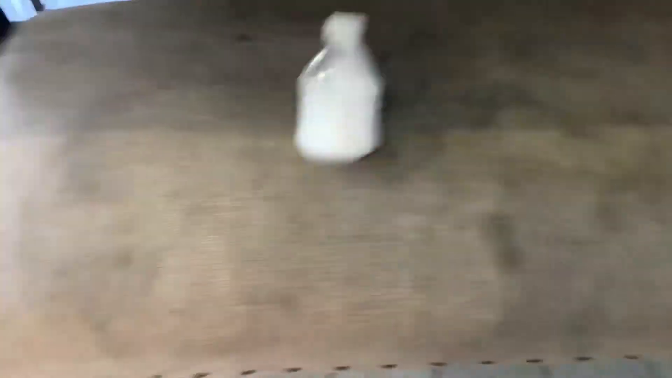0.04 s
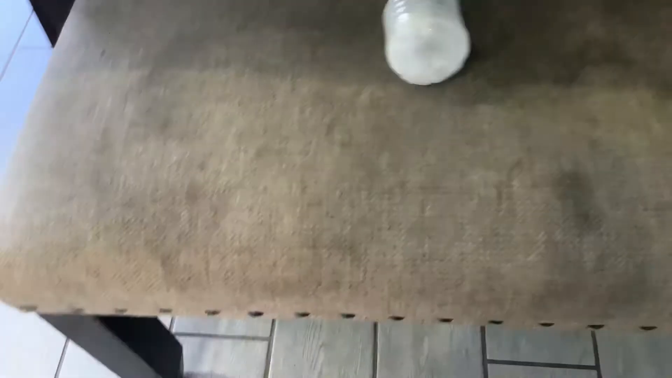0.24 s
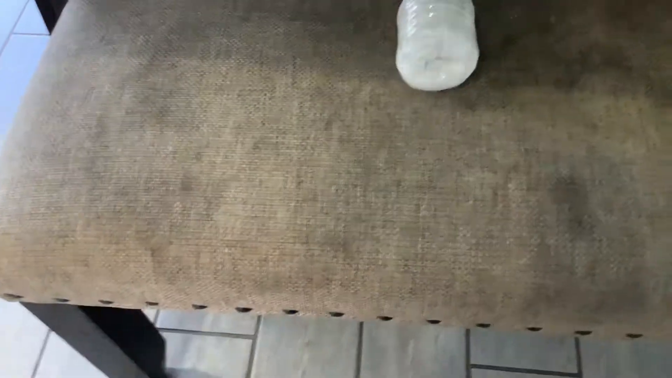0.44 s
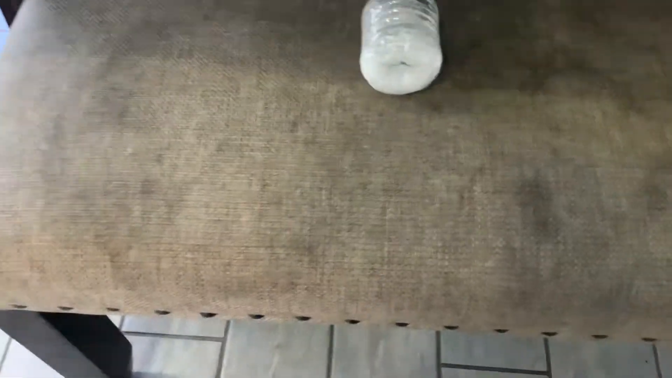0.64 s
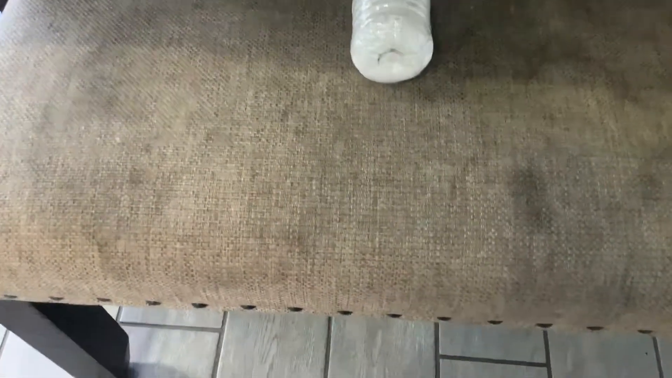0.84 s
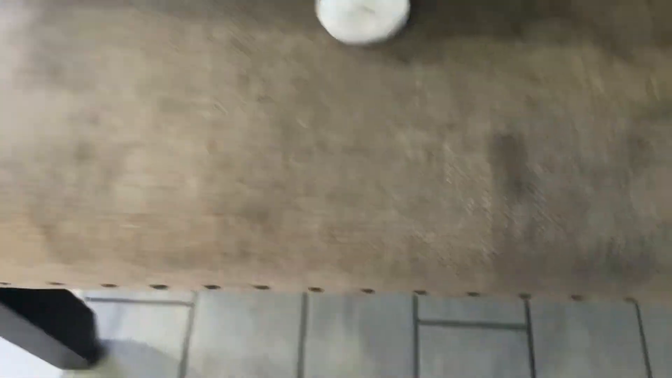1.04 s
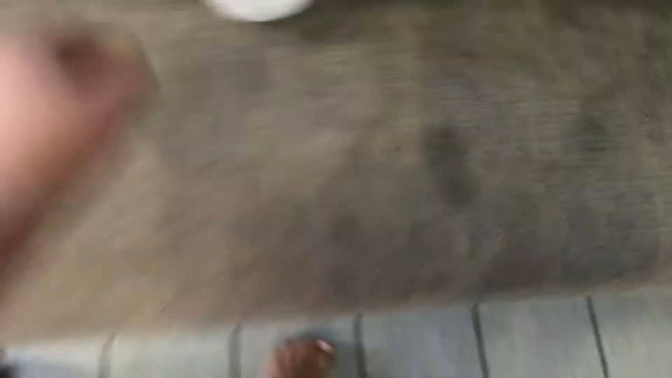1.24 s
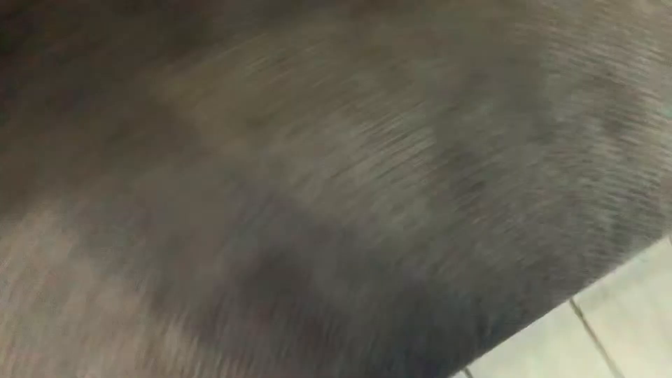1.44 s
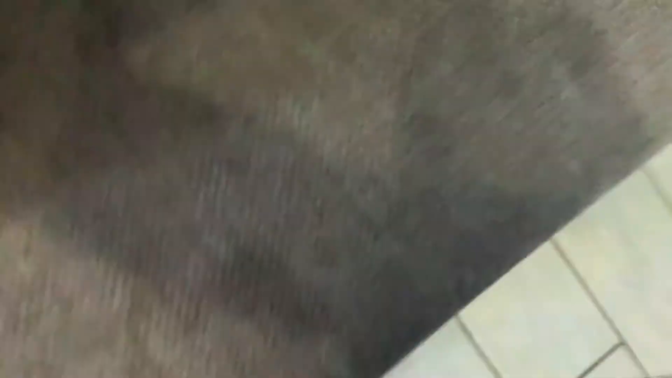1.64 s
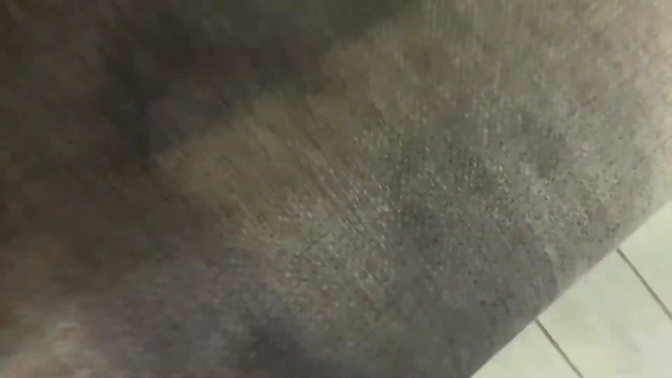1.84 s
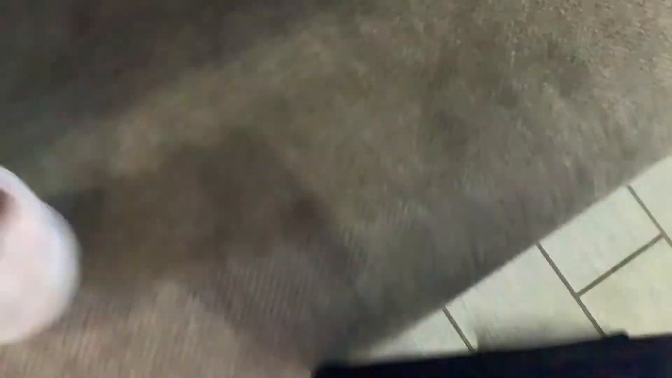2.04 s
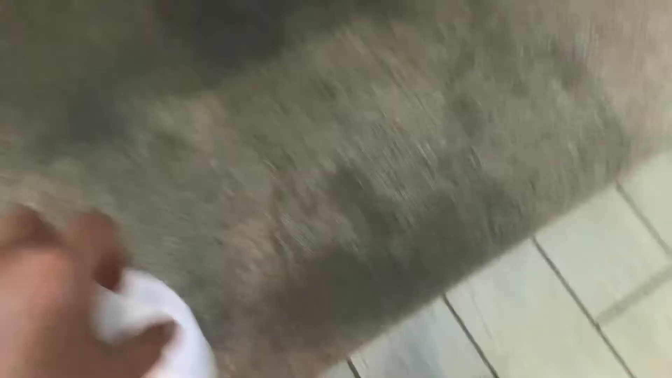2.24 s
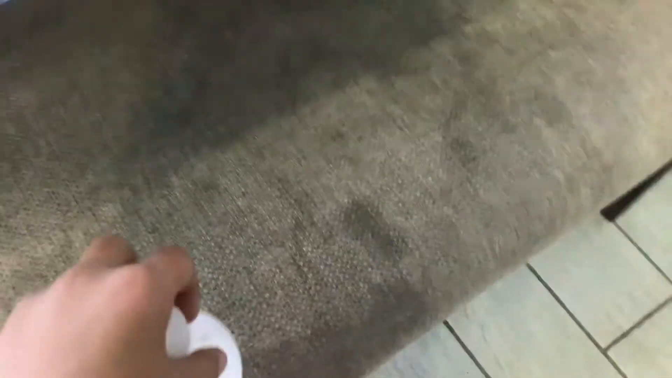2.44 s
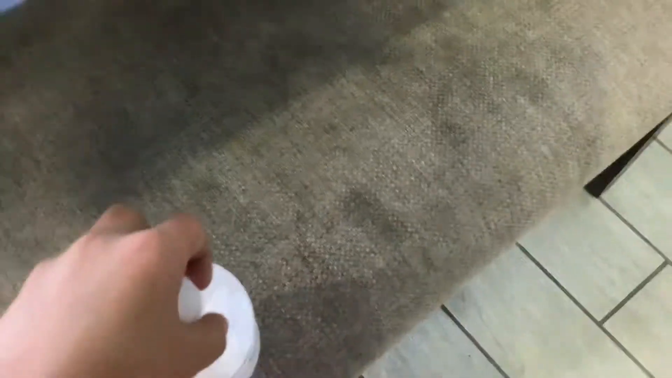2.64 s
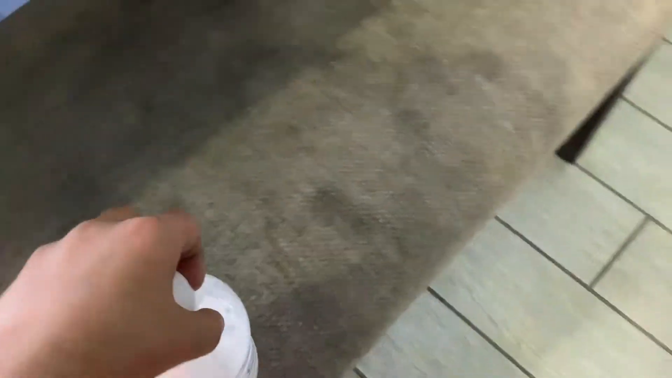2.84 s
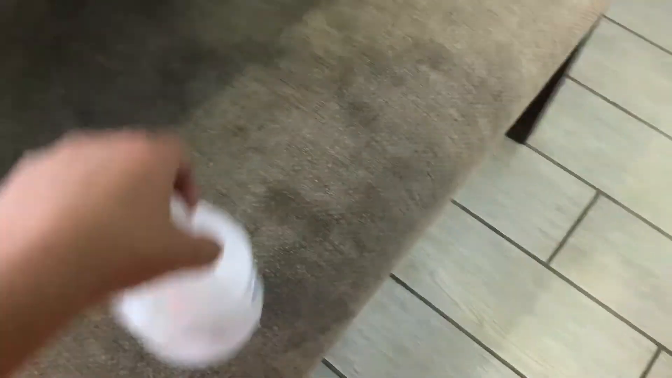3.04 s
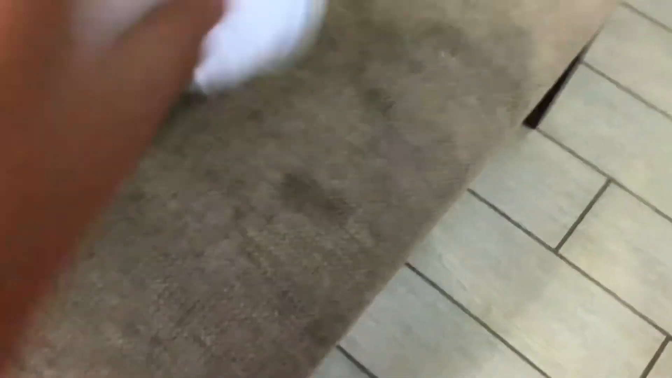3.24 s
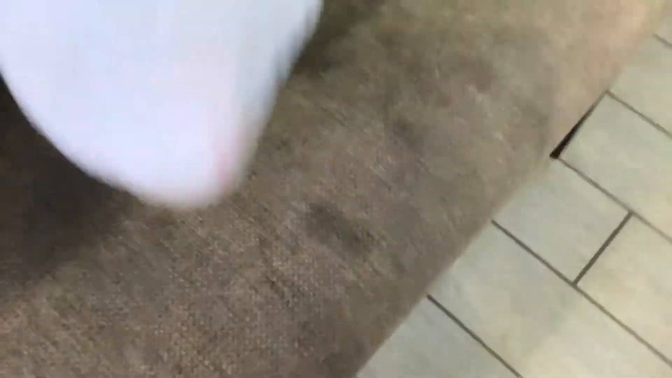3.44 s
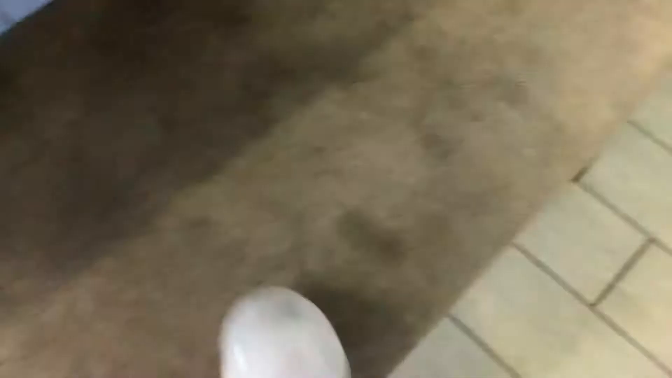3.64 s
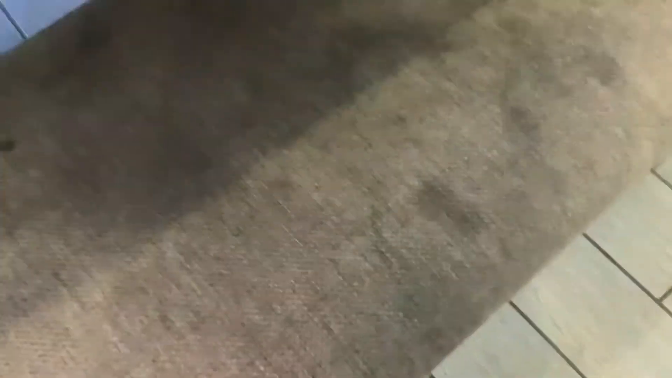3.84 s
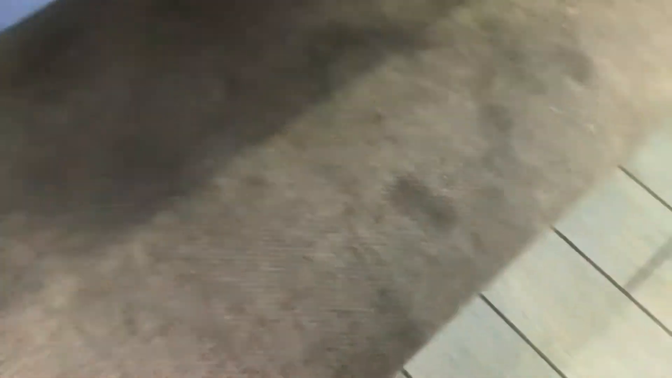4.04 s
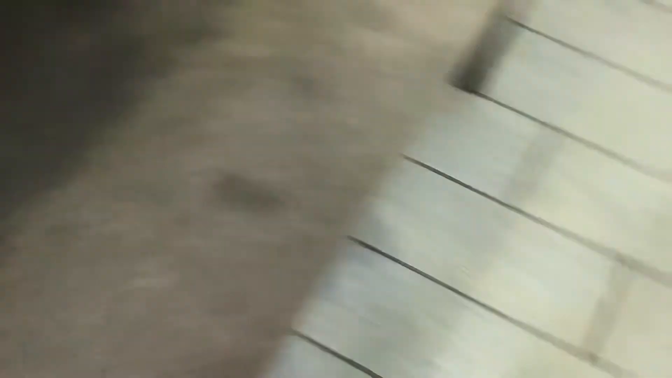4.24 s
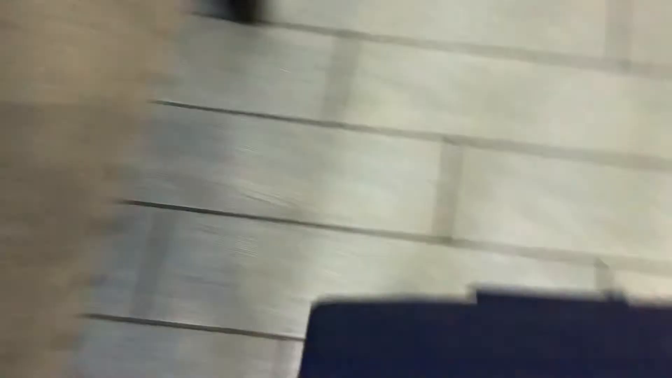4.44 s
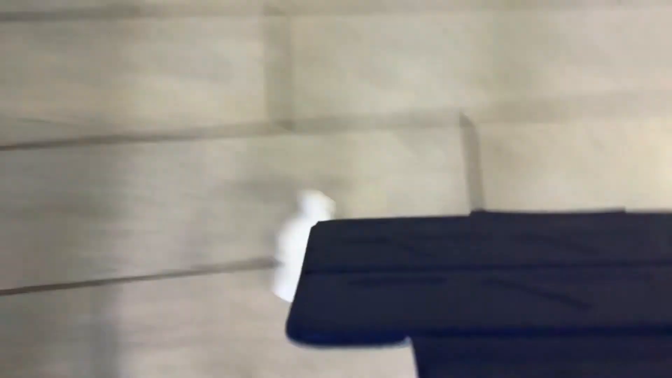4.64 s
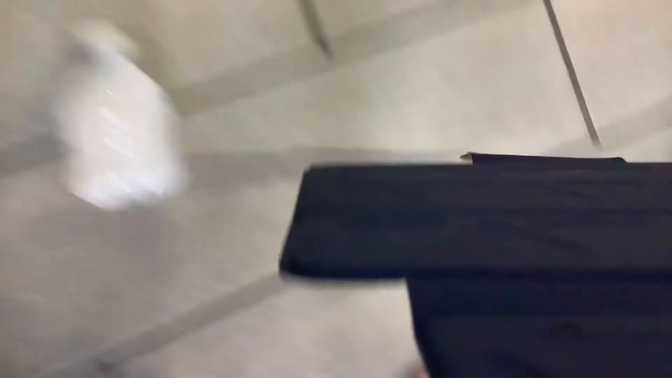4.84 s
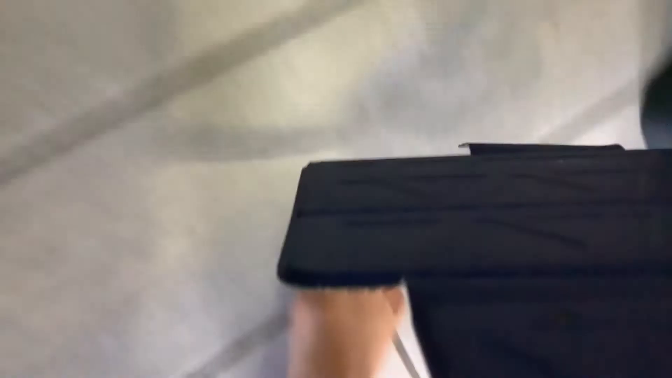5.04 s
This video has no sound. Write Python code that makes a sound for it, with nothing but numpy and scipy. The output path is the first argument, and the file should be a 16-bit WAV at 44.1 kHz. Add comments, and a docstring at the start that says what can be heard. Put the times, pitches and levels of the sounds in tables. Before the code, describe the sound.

Two dull thumps of a plastic water bottle on a cushion, light handling ticks, then a loud crack on a tiled floor.

```python
"""A part-filled plastic bottle is flipped onto a padded bench, picked up, flipped again and falls on tiles.
On the bench the bottle rings low, the cushion and the room boom and the water slaps; on the floor it
cracks sharply and the tiled room echoes. In between, its thin wall snaps and fingers tick and rub on it.
Cloth and skin rustle near a handheld phone, a foot slides, and an appliance hums over a low rush."""
import sys
import numpy as np
from scipy import signal
from scipy.fft import rfft, irfft, next_fast_len
from scipy.io import wavfile
from scipy.ndimage import map_coordinates

SR = 44100
rng = np.random.default_rng(int(sys.argv[2]) if len(sys.argv) > 2 else 0)


def store_pcm(level_fs):
    """Save levels as 16-bit WAV."""
    pcm = np.round(np.clip(level_fs, -1, 1) * 32767).astype(np.int16)
    wavfile.write(sys.argv[1], SR, np.atleast_2d(pcm).T)


N = 225174
TIME = np.arange(N) / SR  # seconds through the scene
T = np.arange(SR // 2) / SR  # seconds through one short sound
RUSH_MEAN_DB, CLOTH_MEAN_DB = -52, -70

# how long the room takes to fade by 60 dB: (frequency [Hz], fade time [s])
ROOM_FADE = [(250, 0.635), (400, 0.604), (700, 0.469), (2000, 0.4806), (6000, 0.453), (14000, 0.398)]
# the hum as the phone moves through loud and quiet spots in the room: (time [s], level [dB])
HUM_LEVEL = [(0.0, -40), (0.5, -42.5), (0.65, -44.5), (1.7, -45), (2.03, -57.5), (2.28, -42.5), (2.76, -37),
             (3.04, -41), (3.5, -42.5), (3.71, -50), (4.08, -41), (4.25, -47), (4.54, -53), (4.82, -46),
             (5.02, -35), (5.11, -38.5)]
# low background rush, plus the room's low boom after each bench landing: (time [s], level [dB])
RUSH_LEVEL = [(0.0, -45), (0.22, -52.5), (0.55, -53), (0.85, -50.5), (1.5, -51.5), (2.2, -52.5), (2.5, -53),
              (2.95, -57.5), (3.2, -51), (3.59, -53.5), (3.63, -43), (3.9, -51), (4.45, -52.5), (4.8, -49),
              (5.11, -51)]
# tone of its low, middle and upper parts: (frequency [Hz], relative level [dB])
RUMBLE_TONE = [(25, -26), (45, -10.5), (65, -3), (90, -1), (115, -3), (150, -28.5)]
RUSH_TONE = [(95, -12), (140, 6.5), (200, 4.5), (260, 1.5), (330, 1.5), (420, -3.5), (560, -44.5)]
WHOOSH_TONE = [(290, -2), (420, 2.5), (600, 0.5), (800, -3.5), (950, -12), (1400, -32.5)]
# cloth sliding as the body moves: (time [s], level [dB])
CLOTH_LEVEL = [(0.0, -71.5), (0.3, -79.5), (0.85, -76.5), (1.05, -71), (1.25, -73), (1.4, -72.5),
               (1.66, -60), (1.85, -69), (2.3, -69), (2.66, -78.5), (2.9, -79.5), (3.1, -72), (3.4, -67),
               (3.9, -68.5), (4.04, -71.5), (4.3, -53.5), (4.5, -71.5), (4.76, -55.5), (4.88, -58),
               (4.96, -66.5), (5.11, -72)]
# tone of far shuffling, near cloth and bright rustles: (frequency [Hz], relative level [dB])
SHUFFLE_TONE = [(600, -30), (950, 3), (1200, 3.5), (1480, 5.5), (1800, 2), (2300, -0.5), (2900, 0),
                (3400, -4.5), (4200, -5.5), (5600, -27)]
CLOTH_TONE = [(2700, 4), (4400, -4), (5500, 1.5), (6600, 1), (8400, -6.5), (11000, -11.5), (16000, -18)]
BRIGHT_TONE = [(3000, -8.5), (5000, -8.5), (8000, -4.5), (10000, -6), (13000, -8), (16000, -10.5)]
# skin brushes and the hissy splash of the bottle landing:
# (peak time [s], level [dB], 20 dB rise [s], 20 dB fall [s])
BRIGHT_RUSTLES = [(.036, -55, 0.0124, 0.058), (0.901, -73.5, 0.025, 0.1325), (1.01, -69, 0.132, 0.054),
                  (1.36, -64, 0.034, 0.105), (1.45, -64.5, 0.054, 0.046), (1.66, -56, 0.257, 0.333),
                  (1.88, -67.5, 0.018, 0.08), (2.18, -62, 0.026, 0.064), (2.46, -68, 0.0453, 0.068),
                  (3.26, -70, .03, 0.044), (3.3, -56, 0.0276, 0.0241), (3.399, -56, 0.0156, 0.015),
                  (3.614, -37, 0.009, 0.0524), (3.721, -64, 0.08, 0.069), (3.835, -53, 0.0375, 0.0176),
                  (4.22, -47.5, 0.022, 0.167), (4.48, -64, 0.037, .15), (4.76, -50.5, 0.184, 0.07),
                  (4.88, -63, 0.11, 0.345)]
# a thin whistle during a slide: (start [s], length [s], pitch [Hz], level [dB], drop [dB])
SLIDE_SQUEAK = (4.785, .1, 6670, -56, 4)
# rubs on the bottle and a foot sliding on the floor:
# (start [s], length [s], level [dB], centre [Hz], band width [times the centre])
SCRAPES = [(1.054, 0.07, -62, 3165, 0.29), (1.203, 0.125, -67, 1454, 0.186),
           (1.313, 0.0825, -65.5, 2820, 0.19), (2.316, 0.073, -65, 1190, 0.69),
           (3.245, 0.112, -69, 1523, .2), (3.291, 0.051, -65, 2870, 0.29), (3.708, 0.07, -50.5, 1074, 1.42),
           (4.738, 0.17, -55.5, 2070, 1.43)]
# wall snaps and finger ticks: (time [s], peak [dB], centre [Hz], band width [times the centre])
PLASTIC_TICKS = [(0.0224, -40.5, 5240, 1.7), (.0273, -30, 8000, 1.22), (.029, -37.5, 2310, 0.07),
                 (.19, -53.5, 10000, 1), (.251, -47.5, 11160, 1.56), (.891, -48, 9900, 1.04),
                 (.952, -50, 7000, 0.51), (1.072, -46, 3220, 0.37), (1.189, -53.5, 6900, 0.56),
                 (1.276, -42.5, 750, 0.54), (1.436, -45.5, 12000, .6), (1.458, -42.5, 13000, .55),
                 (1.499, -37.5, 1800, 5.1), (1.517, -43.5, 6000, 1.4), (1.549, -38.5, 5000, 2.4),
                 (1.583, -40.5, 3500, 1.5), (1.597, -37.5, 7000, 0.64), (1.622, -31.5, 4000, 4),
                 (1.642, -34.5, 2400, 1.3), (1.985, -47.5, 1470, 0.53), (2.174, -41.5, 11100, 1.12),
                 (2.224, -37.5, 670, 0.45), (2.334, -46, 1510, 3.4), (2.561, -49, 9000, 2.06),
                 (3.253, -43.5, 11000, 1.1), (3.291, -43, 12000, 1.249), (3.306, -43, 8000, 1.5),
                 (3.388, -39.5, 10000, 2.4), (3.4022, -22.5, 10000, 0.834), (3.6, -27.5, 7100, 2.94),
                 (3.608, -22.5, 3570, 3.3), (3.679, -40, 12000, 0.8), (3.7174, -30, 1470, 1.95),
                 (3.743, -46.5, 10000, 0.3884), (3.831, -35, 12500, 0.303), (4.214, -20, 7300, 0.86),
                 (4.223, -27, 13500, 1.1), (4.46, -47, 10000, 0.63), (4.556, -50.5, 6000, 0.56),
                 (4.607, -38.5, 1500, 1.35), (4.753, -36.5, 896, 2.04), (4.759, -30, 8000, 0.66),
                 (4.784, -45, 12100, 1.3), (4.881, -47, 12000, 0.82), (5.041, -33.5, 7600, 2.95)]
# the notes the bottle rings with: (pitch [Hz], relative level [dB], fade time [s])
BOTTLE_NOTES = [(266.1, 3, 0.0439), (341.1, -2.5, 0.105), (432.1, -6, 0.052), (625.5, -9, 0.03),
                (816, -18.5, 0.036)]
# the wall rings as the fingers let go: (time [s], level [dB], pitch [Hz], fade time [s])
RELEASE_RINGS = [(3.407, -26, 192.8, 0.269)]
# water slapping inside after a landing: (time [s], level [dB], rise [s], fade time [s])
WATER_SLAPS = [(.028, -39, 0.00267, 0.2297), (3.609, -42.5, 0.00097, 0.166)]
# tone of that water: (frequency [Hz], relative level [dB])
WATER_TONE = [(600, 10), (1500, 8.5), (2400, 6.5), (5000, 1.5), (9000, 3), (13000, -1.5), (16000, -11.5)]
# soft blows on the bench: (time [s], bottle level [dB], cushion level [dB], cushion pitch [Hz])
BENCH_BLOWS = [(.024, -28, -21, 123.8), (.058, -45.5, -32, 123), (.14, -50, -31.5, 119),
               (1.474, -36.5, -57, 109), (1.495, -46, -28, 114.4), (1.549, -38.5, -50, 110),
               (1.622, -30.5, -35, 109.8), (1.647, -33.5, -56.5, 110), (1.68, -40.5, -37, 102),
               (1.708, -48, -39.5, 104), (3.6, -21.5, -19.5, 124.2), (3.611, -24.5, -67, 111.9),
               (3.618, -29.5, -13, 83.4), (3.718, -26, -23, 97.5), (3.789, -33, -30, 89.2),
               (3.841, -47.5, -35, 100.8)]
# the bottle hits the tiles, edge then body: (time [s], crack level [dB], knock level [dB])
TILE_BLOWS = [(4.0732, -29.5, -45), (4.0826, -8.5, -34.5), (4.0837, -11, -33.5), (4.0906, -11.5, -27),
              (4.1, -28.5, -23.5), (4.209, -50, -36.5)]
# tone of the crack, and of the part that fills the room: (frequency [Hz], relative level [dB])
CRACK_TONE = [(220, -37.5), (420, 6), (1000, -6.5), (2000, 4), (3500, 2), (5500, -8), (7400, 2.5),
              (9000, -7.5), (13000, -5.5), (16000, -15)]
ECHO_TONE = [(260, -21.5), (325, 3.5), (550, 3.5), (1000, -6), (1900, -3), (3000, -4), (5000, -11.5),
             (7500, -9.5), (12000, -17), (16000, -27)]


def amp(db):
    """Turn decibels into a number to multiply by."""
    return 10 ** (np.asarray(db) / 20)


def unit(x):
    """Scale a sound to an average (rms) strength of 1."""
    return x / np.sqrt(np.mean(x ** 2) + 1e-20)


def along(points, hz):
    """Read a frequency table between its rows, with octaves evenly spaced."""
    freqs, values = np.transpose(points)
    return np.interp(np.log(hz + 1), np.log(freqs + 1), values)


def curve(points):
    """Join (time, level) points into one level per sample."""
    return np.interp(TIME, *np.transpose(points))


def wobble(rate):
    """A smooth curve through `rate` random values a second."""
    return map_coordinates(rng.standard_normal(int(N * rate / SR) + 4), [TIME * rate])


def coloured(x, response):
    """Filter a sound: response(hz) says how much of each frequency passes."""
    size = next_fast_len(len(x) + 8192)
    return irfft(rfft(x, size) * response(np.fft.rfftfreq(size, 1 / SR)), size)[:len(x)]


def resonance(hz, width):
    """A filter that passes one band around hz, squared for steep sides."""
    return lambda f: (1j * f * hz * width / (hz * hz - f * f + 1j * f * hz * width)) ** 2


def noise(tone, size, grain_db=0):
    """Noise shaped by a tone table; grain breaks it into tiny uneven scratches."""
    raw = rng.standard_normal(size) * amp(grain_db * wobble(700)[:size])
    inside = lambda hz: (hz > tone[0][0]) & (hz < tone[-1][0])
    return unit(coloured(raw, lambda hz: amp(along(tone, hz)) * inside(hz)))


def add(track, start, sound):
    """Mix a sound in at `start` seconds."""
    track[round(start * SR):][:len(sound)] += sound


def fade(fade_s, rise_s):
    """A soft start, then a fall of 60 dB every fade_s seconds."""
    return amp(-60 * T / fade_s) * (1 - np.exp(-T / rise_s))


def sagging(hz, sag, settle_s):
    """A note that starts high and settles to hz as the tension eases."""
    return np.sin(2 * np.pi * hz * (T + sag * settle_s * (1 - np.exp(-T / settle_s))))


def room(x):
    """The echo of the tiled room: each frequency dies away at its own speed."""
    hz, t, bands = signal.stft(rng.standard_normal(SR), SR, nperseg=256)
    decay = amp(-60 * t / along(ROOM_FADE, hz)[:, None])
    tail = signal.istft(bands * decay, SR, nperseg=256)[1]
    delayed = np.pad(x, (250, 0))
    return signal.fftconvolve(delayed, tail / np.linalg.norm(tail))[:N]


def appliance_hum(mains_hz=60):
    """Magnetism makes a hum at twice the mains frequency, with a trace of the mains itself."""
    phase = 2 * np.pi * mains_hz * TIME
    loudness = amp(curve(HUM_LEVEL) + 0.39 * wobble(5.7))
    return loudness * np.sin(2 * phase + 0.44 * wobble(6.63)) + amp(-54.5) * np.sin(phase)


def rush_and_boom():
    """A low background rush that swells into the room's boom after each bench landing."""
    rush_db = curve(RUSH_LEVEL)
    swell_db = rush_db - RUSH_MEAN_DB
    moving_db = curve(CLOTH_LEVEL) - CLOTH_MEAN_DB
    waver_db = 1.4 * wobble(12)
    rumble = amp(-51 + 1.88 * swell_db + 0.81 * wobble(8.9)) * noise(RUMBLE_TONE, N)
    rush = amp(rush_db + waver_db) * noise(RUSH_TONE, N)
    whoosh = amp(-57.5 + 0.672 * swell_db + 0.193 * moving_db + waver_db) * noise(WHOOSH_TONE, N)
    return rumble + rush + whoosh


def cloth_rustle():
    """Sliding cloth makes scratchy noise, dull far away and bright close by."""
    cloth_db = curve(CLOTH_LEVEL)
    far_db = -63 + 0.48 * (cloth_db - CLOTH_MEAN_DB)
    far = amp(far_db + 1.23 * wobble(17)) * noise(SHUFFLE_TONE, N, grain_db=1.23)
    near = amp(cloth_db + 1.6 * wobble(20)) * noise(CLOTH_TONE, N, grain_db=0.75)
    return far + near


def bright_rustles(hiss_db=-82.5):
    """Skin brushes and a landing's hissy splash: short, grainy swells over a faint hiss."""
    swells = sum(amp(db - 20 * np.maximum((peak - TIME) / rise, (TIME - peak) / fall))
                 for peak, db, rise, fall in BRIGHT_RUSTLES)
    flicker = amp(2.65 * wobble(35))
    return (amp(hiss_db) + swells) * flicker * noise(BRIGHT_TONE, N, grain_db=2.0)


def squeak():
    """One slide whistles briefly with a shaky pitch."""
    start, length, hz, db, drop_db = SLIDE_SQUEAK
    progress = (TIME - start) / length
    sounding = (progress > 0) & (progress < 1)
    loudness = amp(db - drop_db * np.clip(progress, 0, 1) + 2.4 * wobble(150))
    pitch = hz + 160 * wobble(300)
    return sounding * loudness * np.sin(2 * np.pi * np.cumsum(pitch) / SR)


def scrapes():
    """Rubs on the bottle and a sliding foot: each is one band of noise that swells and fades."""
    out = np.zeros(N + SR)
    for start, length, db, hz, width in SCRAPES:
        size = round(length * SR)
        scrape = unit(coloured(rng.standard_normal(size), resonance(hz, width)))
        add(out, start, amp(db + 2.1 * wobble(51)[:size]) * np.hanning(size) * scrape)
    return out[:N]


def plastic_ticks():
    """The wall snaps or a finger taps: a sharp pulse with a scratchy tail, filtered to one band."""
    out, size = np.zeros(N + SR), SR // 8
    snap_and_tail = 0.904 * fade(0.00298, 0.0001) + 0.207 * fade(0.039, 0.00025)
    for start, db, hz, width in PLASTIC_TICKS:
        burst = rng.standard_normal(size) * snap_and_tail[:size]
        burst[0] = 2.07  # the opening pulse
        tick = coloured(burst, resonance(hz, width))
        add(out, start, amp(db) * tick / np.abs(tick).max())
    return out[:N]


def bottle_release():
    """The plastic wall rings as the fingers let go."""
    out = np.zeros(N + SR)
    for start, db, hz, fade_s in RELEASE_RINGS:
        add(out, start, amp(db) * fade(fade_s, 0.00214) * sagging(hz, sag=0.18, settle_s=0.011))
    return out[:N]


def water_slaps():
    """Water hits the inside of the bottle in a burst of grainy noise."""
    out = np.zeros(N + SR)
    for start, db, rise_s, fade_s in WATER_SLAPS:
        add(out, start, amp(db) * fade(fade_s, rise_s) * noise(WATER_TONE, len(T), grain_db=2.0))
    return out[:N]


def bottle_knock(rise_s, hardness):
    """A blow rings the bottle's notes unevenly; hardness lifts the high ones, in dB per octave."""
    out = np.zeros(len(T))
    for hz, db, fade_s in BOTTLE_NOTES:
        lift_db = hardness * np.log2(hz / BOTTLE_NOTES[0][0])
        out += amp(db + lift_db + rng.normal(0, 2.11)) * fade(fade_s, rise_s) * np.sin(2 * np.pi * hz * T)
    return out


def bottle_on_bench(cushion_lag_s=0.005686):
    """Soft landings: the bottle rings low and the cushion booms a moment later."""
    out = np.zeros(N + SR)
    for start, bottle_db, cushion_db, hz in BENCH_BLOWS:
        add(out, start, amp(bottle_db) * bottle_knock(rise_s=0.00234, hardness=-0.74))
        boom = fade(0.084, 0.00265) * sagging(hz, sag=0.279, settle_s=0.0111)
        add(out, start + cushion_lag_s, amp(cushion_db) * boom)
    return out[:N]


def bottle_on_tiles():
    """Hard landings: a short crack over a bright knock; the hardest one sets the room echoing."""
    out, pulse = np.zeros(N + SR), np.zeros(N)
    for start, crack_db, knock_db in TILE_BLOWS:
        crack = amp(crack_db) * fade(0.0256, 0.000325) * noise(CRACK_TONE, len(T))
        knock = amp(knock_db) * bottle_knock(rise_s=0.00215, hardness=11.4)
        add(out, start, crack + knock)
    hardest_s = TILE_BLOWS[1][0]
    pulse[round(hardest_s * SR)] = amp(19.5)
    echo = room(coloured(pulse, lambda hz: amp(along(ECHO_TONE, hz))))
    return out[:N] + echo


def scene():
    """Mix everything; sounds close to the phone get only a little echo."""
    near = plastic_ticks() + scrapes() + bottle_on_bench() + water_slaps() + bottle_release()
    foreground = near + amp(-15.5) * room(near) + bottle_on_tiles()
    background = appliance_hum() + rush_and_boom() + cloth_rustle() + bright_rustles() + squeak()
    return (foreground + background)[None]


def record(dry):
    """The phone cuts the deep bass and the very highest treble."""
    bass_hz, top_hz = 45, 15900
    return coloured(dry[0], lambda hz: (hz < top_hz) * (1j * hz / (bass_hz + 1j * hz)) ** 4)[None]


dry = scene()
out = record(dry)
store_pcm(out)
```